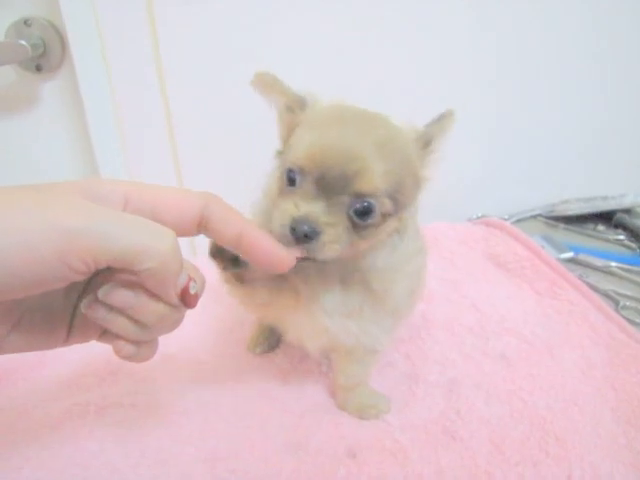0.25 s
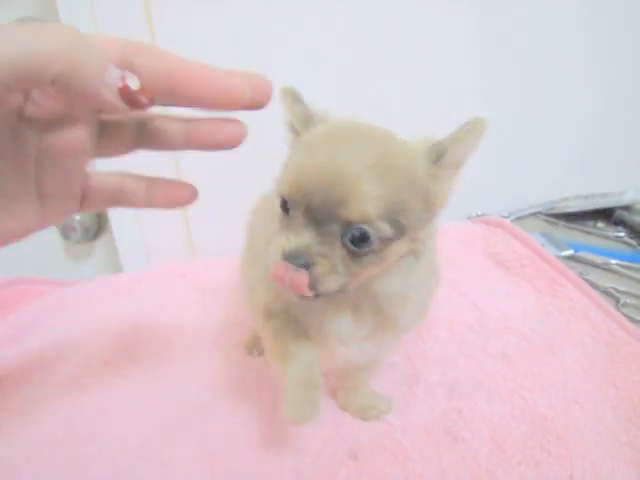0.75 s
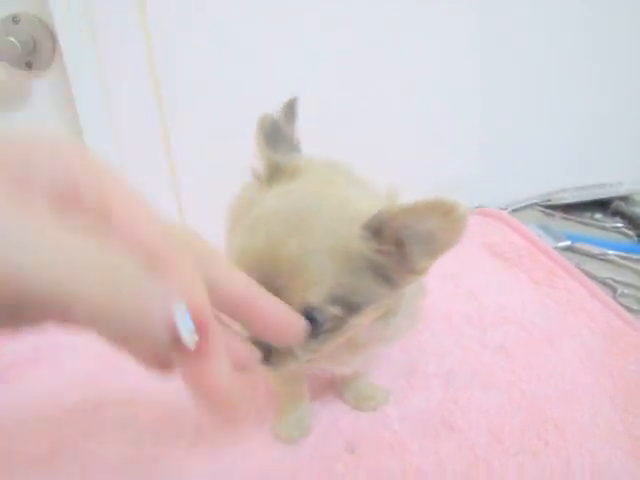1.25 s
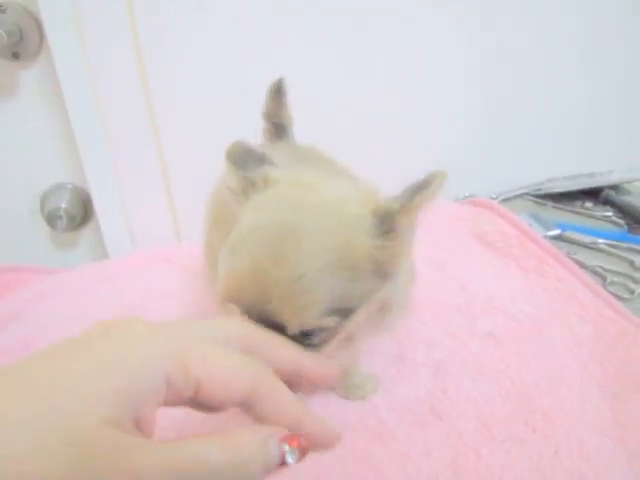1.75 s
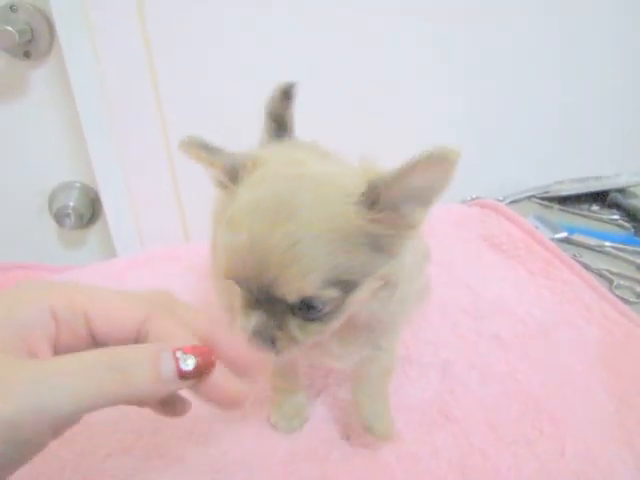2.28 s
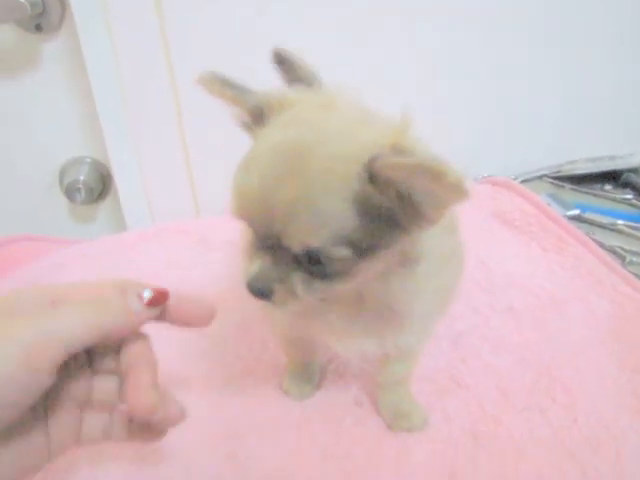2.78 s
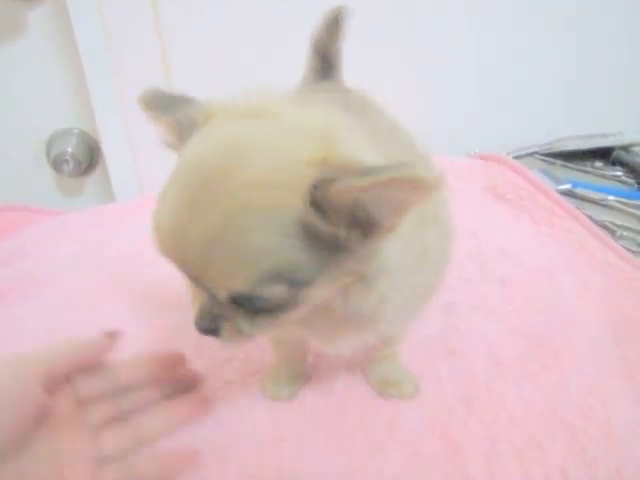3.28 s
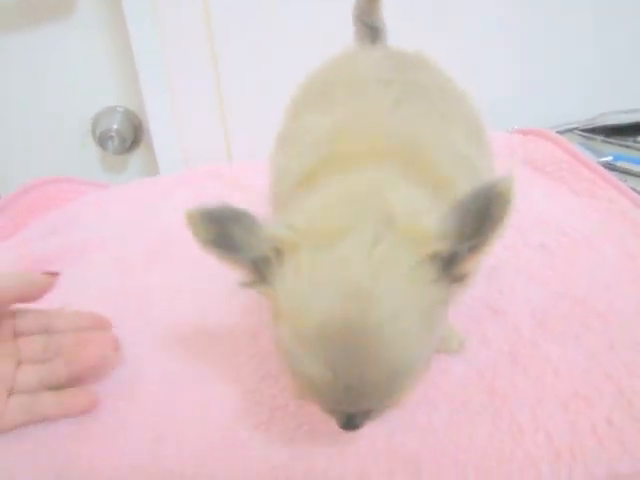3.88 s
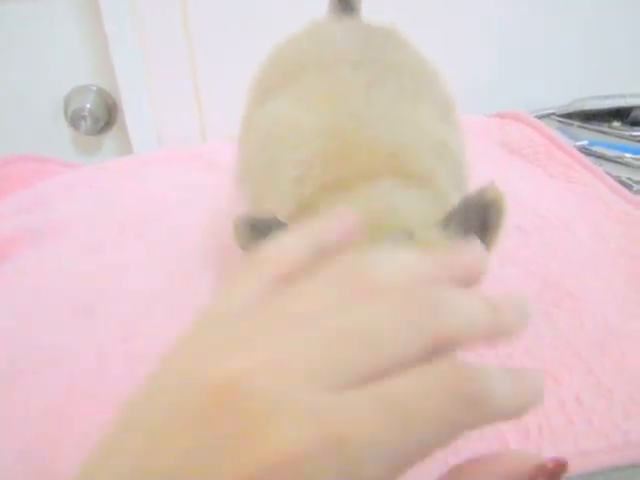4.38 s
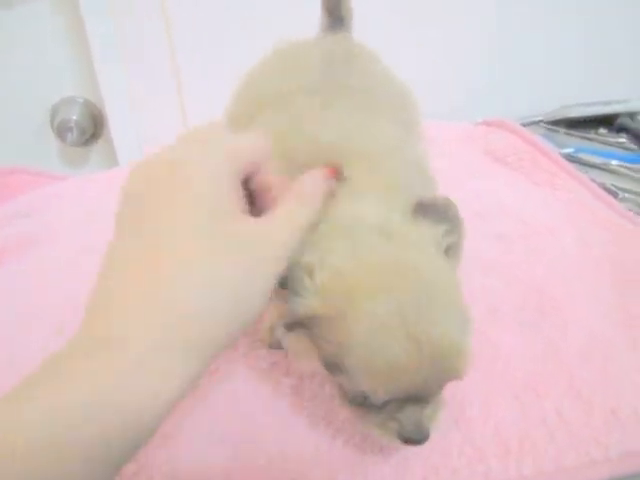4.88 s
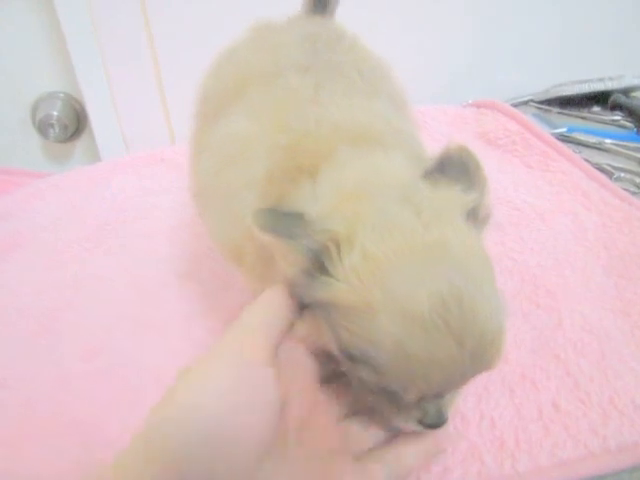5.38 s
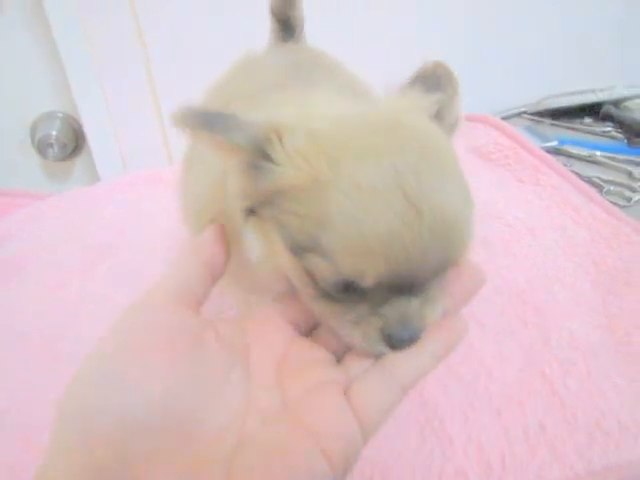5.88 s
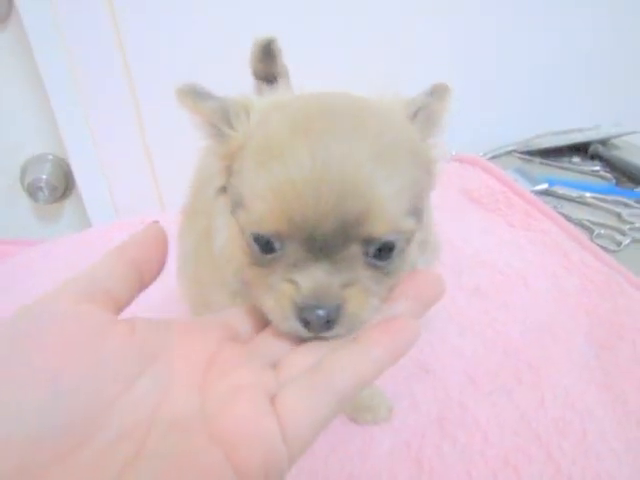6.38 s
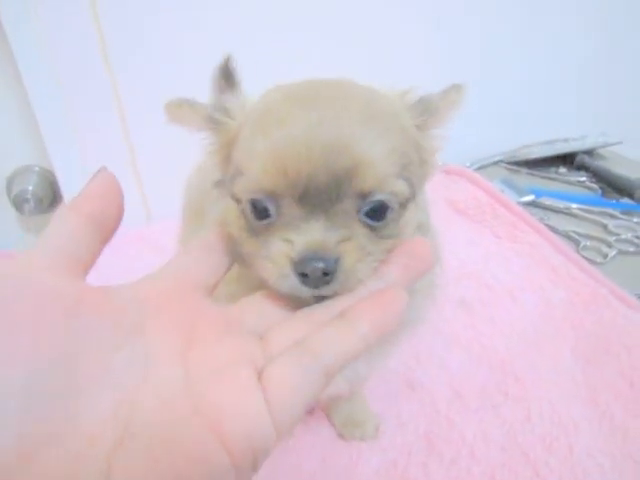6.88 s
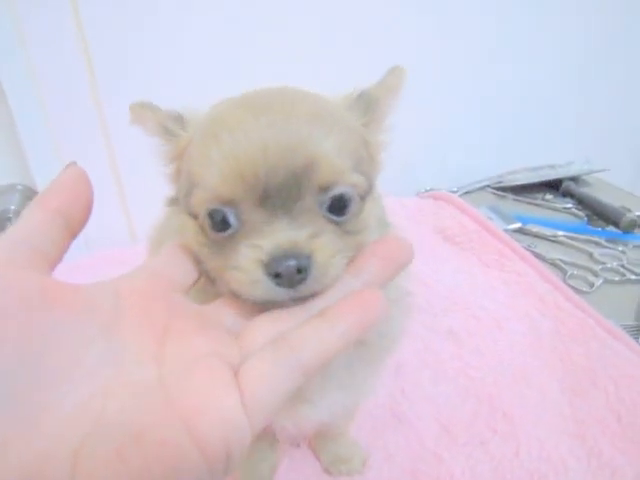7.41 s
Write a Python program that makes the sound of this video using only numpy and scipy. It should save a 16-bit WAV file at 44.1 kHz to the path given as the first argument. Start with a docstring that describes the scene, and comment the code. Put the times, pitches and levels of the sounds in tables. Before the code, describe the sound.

Quick, faint puppy sniffs and little nibbling clicks sound close and dry over a low hum and hiss. A dog gives a closed-mouth grumble, and later two sharp yaps ring off the walls of the room. A long, wavering howl follows, breaking harshly once and sinking in pitch. After a short pause comes one quiet nasal whimper, then a fast-swelling squeal that is cut off.

```python
"""A hard-walled room, where a dog grumbles, yaps twice, draws out a howl, whimpers and starts to squeal.
Each call is buzzing vocal folds and rasping breath, coloured by the throat and ringing off the walls.
Close up and dry, a tiny puppy sniffs in quick puffs of air and nibbles at a hand on a towel,
with small clicks of mouth, paws and fingernails. Rumble, machine hum and hiss lie underneath,
and a limiter ducks everything after the louder yap."""
import sys
import numpy as np
from scipy import signal
from scipy.fft import rfft, irfft, next_fast_len
from scipy.io import wavfile
from scipy.ndimage import uniform_filter1d

SR = 44100
rng = np.random.default_rng(int(sys.argv[2]) if len(sys.argv) > 2 else 0)


def output_pcm(signal):
    """Save a mono or channel-first signal as 16-bit PCM at the path in sys.argv[1].

    Samples are clipped to [-1, 1] before scaling.
    """
    pcm = np.clip(np.atleast_2d(signal).T, -1, 1) * 32767
    wavfile.write(sys.argv[1], SR, np.round(pcm).astype(np.int16))


N = 337365
TIME = np.arange(N) / SR
EDGE_HZ = 15900


def yaps():
    """Two sharp yaps, each through its own throat shape; the second is louder."""
    # start/s, first f/Hz, top f/Hz, swell/s, swell/dB, peak/dB, fade/(dB/s), top roughness/0-1,
    # first and top brightness/(dB/octave)
    first, second = [(3.585, 289.6, 814.5, .09, 13, -11.5, 170, .45, -13.5, 4.5),
                     (4.186, 487, 799.9, .078, 21, -2, 229, .29, -5.5, -0.5)]
    # throat resonances of each yap: f/Hz, gain/dB
    first_throat = [(150, -39), (350, -3), (620, -24.5), (860, 9.5), (1150, -3.5), (1600, 11), (1850, -4),
                    (2550, -17), (3200, 6), (3650, -47.5), (4900, -24), (5600, -41), (12000, -48),
                    (15000, -66)]
    second_throat = [(300, -37.5), (550, -33.5), (800, -15.5), (1100, -5.5), (1650, -2.5), (1820, -21),
                     (2600, -26), (3100, -15), (3600, -28), (4600, -14.5), (5400, -41), (6200, -34),
                     (7500, -65), (12000, -47), (15000, -61.5)]
    return (voice(yap_contour(*first), first_throat, opening=.13, jitter=.08, rasp=.75)
            + voice(yap_contour(*second), second_throat, opening=.06, jitter=.1, rasp=.65))


def yap_contour(start, first_hz, top_hz, swell_s, swell_db, peak_db, fade_db_per_s, top_rough,
                first_bright_db, top_bright_db):
    """The mouth snaps open and the pitch scoops up, clearing and swelling; then it sags and fades."""
    length_s, attack_s, release_s, mouth_opens_s = .185, .023, .052, .036
    sag_hz_per_s, first_rough = 108, .563
    t = np.arange(0, length_s, .001)
    scoop = np.sin(np.pi / 2 * np.minimum(t / swell_s, 1)) ** 2
    after = np.maximum(t - swell_s, 0)
    pitch = first_hz + (top_hz - first_hz) * scoop - sag_hz_per_s * after
    gate = np.clip(np.minimum(t / attack_s, (length_s - t) / release_s), .01, 1)
    level_db = peak_db - swell_db * np.maximum(1 - t / swell_s, 0) - fade_db_per_s * after
    rough = first_rough + (top_rough - first_rough) * scoop
    bright_db = np.interp(t, [0, mouth_opens_s], [first_bright_db, top_bright_db])
    return np.transpose([start + t, pitch, level_db + 20 * np.log10(gate), rough, bright_db])


def howl(quaver_hz=17, fry_hz=385.3, break_s=5.78, break_width_s=.074):
    """A clean, quavering note that rattles where it is low, breaks harshly once and stays hoarse."""
    # the sung line: t/s, f/Hz, level/dB
    melody = [(4.42, 294.5, -37), (4.53, 335, -34.5), (4.6, 422, -30), (4.78, 457, -30),
              (4.92, 458.8, -28.5), (5.18, 450, -26.5), (5.31, 437, -34.5), (5.42, 420.2, -28),
              (5.56, 364.5, -33.5), (5.66, 381.4, -31.5), (5.721, 475, -31), (5.77, 504.6, -28),
              (5.83, 475.2, -29.5), (5.89, 381.3, -32), (5.97, 366.2, -38.5), (6.05, 380.6, -27.5),
              (6.15, 352.4, -34), (6.2, 314.7, -30), (6.3, 214.8, -38), (6.35, 187.7, -46)]
    # rounded throat: f/Hz, gain/dB
    throat = [(150, 13), (400, 8.5), (620, -2.5), (920, 5), (1080, -13.5), (1300, -24.5), (1800, -24.5),
              (2150, -54.5), (4000, -85), (7000, -101.5)]
    # cracks into period doubling: t/s, length/s, depth/0-1
    cracks = [(5.01, .06, .25), (6.015, .06, .35)]
    at, hz, db = np.transpose(melody)
    t = np.arange(at[0], at[-1], 1 / SR)
    strain = np.exp(-((t - break_s) / break_width_s) ** 2)
    pitch = np.interp(t, at, hz) * (1 + .005 * waver(len(t), quaver_hz))
    fade = signal.windows.tukey(len(t) + 2, .04)[1:-1]
    quaver_db = 1.5 * waver(len(t), quaver_hz)
    level_db = np.interp(t, at, db) + 1.5 * strain + quaver_db + 20 * np.log10(fade)
    fry = np.maximum(1 - pitch / fry_hz, 0)
    rough = .021 + .85 * fry + .14 * strain + .1 * (t > break_s)
    bright_db = 1.8 + 16.5 * strain
    contour = np.transpose([t, pitch, level_db, rough, bright_db])
    return voice(contour, throat, opening=.04, jitter=.14, rasp=.45, cracks=cracks)


def nose_whistles():
    """Thin, fuzzy whistles of air in the nose ride on the howl, swelling and fading as they rise."""
    # start/s, end/s, first f/Hz, last f/Hz, peak/dB
    glides = [(5.42, 5.788, 4110, 4410, -62), (5.807, 6.194, 4265, 4957, -62.5)]
    out = np.zeros(N)
    for start, end, first_hz, last_hz, peak_db in glides:
        progress = np.clip((TIME - start) / (end - start), 0, 1)
        pitch = (first_hz + (last_hz - first_hz) * progress) * (1 + .04 * waver(N, 500))
        tone = np.sqrt(2) * np.sin(2 * np.pi * np.cumsum(pitch) / SR)
        out += amp(peak_db) * np.sin(np.pi * progress) * tone
    return out


def grumbles():
    """Low, raspy swells of voice behind a closed mouth."""
    # start/s, peak/s, end/s, top f/Hz, peak/dB, peak roughness/0-1, brightness/(dB/octave)
    swells = [(.3, .74, 1.3, 203.8, -34.5, 0.14, -2), (3.3, 3.61, 3.7, 235, -35, .55, -11)]
    # throat with the mouth shut: f/Hz, gain/dB
    throat = [(100, -3), (200, 3.5), (400, -6), (600, -23.5), (900, -23.5), (1500, -33), (3000, -70)]
    return sum(voice(soft_contour(*row, droop=.27, fade_db=-18.5), throat, jitter=.14, rasp=.97)
               for row in swells)


def whimper():
    """One small whimper through the nose."""
    # start/s, peak/s, end/s, top f/Hz, peak/dB, peak roughness/0-1, brightness/(dB/octave)
    swells = [(7.281, 7.386, 7.51, 389, -43, 0.23, 1.5)]
    # nasal resonances: f/Hz, gain/dB
    throat = [(380, -29), (780, 2), (1150, 3), (1550, -9.5), (2200, -14), (2500, -8), (2850, -3.5),
              (3700, -31), (5000, -22), (7000, -35)]
    return voice(soft_contour(*swells[0], droop=.08, fade_db=-16), throat, rasp=.56)


def soft_contour(start, peak, end, top_hz, peak_db, rough, bright_db, droop, fade_db):
    """One swell of effort: towards both ends the voice is lower, weaker and rougher."""
    t = np.arange(start, end, .002)
    slack = np.sin(np.pi / 2 * np.interp(t, [start, peak, end], [1, 0, 1])) ** 2
    pitch = top_hz * (1 - droop * slack)
    level_db = peak_db + fade_db * slack
    return np.transpose([t, pitch, level_db, rough + .23 * slack, np.full(len(t), bright_db)])


def squeal(rough=.11, bright_db=-16):
    """A nearly pure high note that swells fast at the very end."""
    # the rising note: t/s, f/Hz, level/dB
    melody = [(7.56, 1073, -56), (7.628, 1115, -35), (7.66, 1126, -7.5)]
    # pinched throat: f/Hz, gain/dB
    throat = [(500, -25), (1120, -7), (2200, -27), (2950, -8), (3600, -29), (7000, -50)]
    return voice([(*point, rough, bright_db) for point in melody], throat, rasp=.46)


def voice(contour, throat, opening=0, jitter=.086, shimmer=.8, rasp=.8, cracks=()):
    """Unsteady vocal folds and pulsing breath, through a throat that can open as the pitch rises."""
    # contour: t/s, f/Hz, level/dB, roughness/0-1, brightness/(dB/octave)
    at, *columns = np.transpose(contour)
    t = np.arange(at[0], at[-1], 1 / SR)
    pitch, level_db, rough, bright_db = (np.interp(t, at, c) for c in columns)
    rough = np.clip(rough, 0, 1)
    mouth = (pitch / pitch.max()) ** opening  # scales the throat's resonances
    tremor = .005 * waver(len(t), 22)
    turns = np.cumsum(pitch * (1 + tremor + jitter * rough * waver(len(t), 350))) / SR
    # in a crack strong and weak cycles alternate, which adds lines halfway between the harmonics
    order = np.arange(1, 33)[:, None] / 2
    split = sum(depth * np.exp(-(2 * (t - when) / length) ** 2) for when, length, depth in cracks)
    partials = amp(read(throat, order * pitch / mouth) + bright_db * np.log2(order))
    partials *= np.where(order % 1, split * (order > 1), 1)
    partials *= (order * pitch < EDGE_HZ) / np.sqrt((partials ** 2).sum(0) / 2)
    folds = (partials * np.cos(2 * np.pi * order * turns)).sum(0)
    folds *= 1 + shimmer * rough * waver(len(t), 250)
    # turbulence takes the same colour, moment by moment
    hz, frames, turbulence = signal.stft(rng.standard_normal(len(t)), SR, nperseg=512)
    f0, opened, tilt_db = (np.interp(frames, t - at[0], c) for c in (pitch, mouth, bright_db))
    octaves = np.log2(np.maximum(hz[:, None] / f0, 1))
    colour = amp(read(throat, hz[:, None] / opened) + tilt_db * octaves)
    colour /= np.sqrt((colour ** 2).mean(0))
    air = signal.istft(turbulence * colour, SR, nperseg=512)[1][:len(t)]
    air *= 1 + .31 * np.cos(2 * np.pi * turns)  # one puff a cycle
    blend = ((1 - rough) * folds + rasp * rough * air) / np.hypot(1 - rough, rasp * rough)
    flutter_db = 1.5 * waver(len(t), 28)
    out = np.zeros(N)
    add(out, at[0], amp(level_db + flutter_db) * blend)
    return out


def sniffs(gap_s=.093, accent_db=2):
    """The puppy sniffs in bouts, weak and strong in turn and often quickening."""
    # first/s, last/s, hurry/0-1, first level/dB, last level/dB, sniff length/s, brightness/(dB/octave)
    bouts = [(.43, 0.482, 0, -59, -60, 0.057, 5), (.626, 1.068, .17, -51, -50.5, 0.035, 5),
             (1.186, 1.248, 0, -52.5, -54, 0.055, 1), (1.916, 2.471, 0.1, -59, -64, 0.044, -1),
             (2.781, 3.55, .23, -54.5, -49, 0.078, -2), (3.695, 4.07, 0, -50, -54, 0.11, -1)]
    # single puffs, plus one stronger, longer sniff in the middle of a bout:
    # centre/s, length/s, level/dB, brightness/(dB/octave)
    puffs = [(0.27, 0.067, -43, -17.5), (3.305, 0.14, -47, -3), (4.982, 0.11, -55, 1.5),
             (5.345, 0.16, -47, -8), (6.52, .08, -44.5, -14)]
    out = np.zeros((2, N))
    for first, last, hurry, first_db, last_db, length, bright_db in bouts:
        count = round((last - first) / gap_s) + 1
        for k, progress in enumerate(np.linspace(0, 1, count)):
            centre = first + (last - first) * (progress + hurry * progress * (1 - progress))
            db = first_db + (last_db - first_db) * progress - accent_db * (-1) ** k
            add(out, *puff(centre, length, db, bright_db))
    for row in puffs:
        add(out, *puff(*row))
    return out


def puff(centre, length, db, bright_db):
    """One smooth draw of air through a tiny nose; gives its start time and its sound."""
    # air in the nostrils: f/Hz, gain/dB
    colour = [(400, -28.5), (1200, -6.5), (2800, 5.5), (5000, 3.5), (7500, 1.5), (12000, -3), (16000, -14)]
    t = (np.arange(8192) - 4096) / SR
    swell = np.exp(-(3.06 * t / length) ** 2)
    return centre + t[0], amp(db) * swell * noise(colour, len(t), bright_db)


def clicks(trim_db=-3, skirt_db=-13, rise_s=.0004):
    """Mouth, paws and fingernails: each contact is a brief burst around one resonance."""
    # the clearest contacts: t/s, level before trim/dB, ring f/Hz, T60/s
    contacts = [(0.431, -36, 2700, .027), (.501, -40.5, 2780, .03), (1.093, -34.5, 2860, 0.016),
                (1.2, -29.5, 3750, 0.01), (1.211, -32, 3950, 0.012), (1.591, -37, 1980, 0.02),
                (1.797, -33, 2390, 0.012), (1.854, -44, 4300, 0.074), (2.127, -38, 1900, .025),
                (2.171, -35.5, 7650, 0.011), (2.659, -41, 620, 0.043), (3.112, -32, 4800, 0.0079),
                (6.1, -17, 5350, 0.0028), (6.94, -30, 10500, .016), (7.059, -33, 4480, .009),
                (7.084, -33.5, 4950, .011)]
    out, t = np.zeros((2, N)), TIME[:8192]
    for start, db, hz, t60 in contacts + nibbles():
        colour = [(hz / 6, 2 * skirt_db), (hz / 1.35, skirt_db), (hz, 0),
                  (hz * 1.35, skirt_db), (hz * 4, 2 * skirt_db), (hz * 20, 4 * skirt_db)]
        envelope = (1 - np.exp(-t / rise_s)) * np.exp(-np.log(1000) * t / t60)
        add(out, start, amp(db + trim_db) * envelope * noise(colour, len(t)))
    return out


def nibbles(count=10, span_s=(.4, 3.2), db=-42, spread_db=3, centre_hz=4600, t60=.017):
    """Fainter contacts at random moments while the puppy nibbles, each with its own force and ring."""
    return [(np.interp(when, [-1, 1], span_s), db + spread_db * force, centre_hz * 2 ** octaves, t60)
            for when, force, octaves in rng.uniform(-.9, 1, (count, 3))]


def room(x, wet_db):
    """Direct sound plus dense reflections off hard walls, dying away band by band."""
    # reverb time: f/Hz, T60/s
    decay = [(150, 0.36), (500, 0.71), (1600, 0.75), (3200, 0.62), (5000, 0.55), (12000, .35)]
    # the side that the reflections favour: f/Hz, left minus right/dB
    lean = [(300, -2.5), (700, -0.5), (1600, 0), (3000, -5), (4400, 7.5), (7000, -4.5)]
    taps = pair(rng.standard_normal((2, SR)) * (rng.random((2, SR)) < .12))
    taps *= TIME[:SR] > .004  # pre-delay
    hz, t, bands = signal.stft(taps, SR, nperseg=256)
    lean_db = np.multiply.outer([.5, -.5], read(lean, hz))[..., None]
    decay_db = 60 * t / read(decay, hz)[:, None]
    tail = signal.istft(bands * amp(lean_db - decay_db), SR, nperseg=256)[1]
    mids = abs(rfft(tail[:, :SR]))[:, 300:3000]
    tail /= np.sqrt(np.mean(mids ** 2))  # unity gain in the mids
    wet = signal.fftconvolve(x[None], tail, axes=1)[:, :N]
    return (x + amp(wet_db) * wet) / np.sqrt(1 + amp(wet_db) ** 2)


def room_tone(rumble_db=-50, hiss_db=-58):
    """A bed of wavering machine hum, room rumble and microphone hiss."""
    # hum lines: f/Hz, level/dB
    lines = [(26.9, -51.5), (58.5, -56), (91, -54.5), (119, -63), (393, -65.5), (1571, -77.5), (10654, -87)]
    # noise colours: f/Hz, relative level/dB
    rumble = [(20, -7), (45, -6), (95, -5.5), (145, -13.5), (215, -12), (290, -14.5), (400, -16),
              (450, -24), (620, -20.5), (900, -23), (1100, -23), (1300, -20), (1550, -38.5), (2100, -55),
              (3500, -100)]
    hiss = [(820, -25), (1400, -6), (1920, -6), (2330, -7.5), (3610, -10.5), (4380, -11), (9320, -16.5),
            (16000, -24.5)]
    hum = np.zeros(N)
    for hz, db in lines:
        level = amp(db) * np.sqrt(2) * (1 + .35 * waver(N, 5))
        hum += level * np.sin(2 * np.pi * hz * TIME + .9 * waver(N, 4))
    return hum + amp(rumble_db) * noise(rumble, N) + amp(hiss_db) * noise(hiss, N)


def noise(colour, size, tilt_db=0):
    """Stereo noise of unit level with a given spectrum, tilted per octave above the bass."""
    padded = next_fast_len(size, True)
    hz = np.fft.rfftfreq(padded, 1 / SR)
    gain = amp(read(colour, hz) + tilt_db * np.log2(1 + hz / 170))
    white = rfft(pair(rng.standard_normal((2, padded))))
    return unit(irfft(white * gain, padded)[:, :size])


def pair(x):
    """Two unrelated signals become what two close microphones hear: alike in the bass."""
    # what both sides share: f/Hz, left-right correlation/0-1
    alike = [(30, 0.54), (85, 0.64), (180, 0.79), (400, 0.87), (800, 0.8), (1600, 0.52), (2800, 0.19),
             (5000, 0.048), (12000, .05)]
    spectra = rfft(x)
    shared = read(alike, np.fft.rfftfreq(x.shape[1], 1 / SR))
    mid = spectra[0] * np.sqrt((1 + shared) / 2)
    side = spectra[1] * np.sqrt((1 - shared) / 2)
    return irfft([mid + side, mid - side], x.shape[1])


def waver(size, hz):
    """A random drift of unit level that changes course hz times a second."""
    at = np.arange(size) * hz / SR
    return unit(np.interp(at, np.arange(8192), rng.standard_normal(8192)))


def read(points, hz):
    """A curve of (f/Hz, value) points, joined on a log-frequency axis."""
    f, value = np.transpose(points)
    return np.interp(np.log(hz + 1), np.log(f + 1), value)


def add(mix, start_s, sound):
    """Mixes a sound in at its start time."""
    part = mix[..., max(round(start_s * SR), 0):][..., :sound.shape[-1]]
    part += sound[..., :part.shape[-1]]


def amp(db):
    """Decibels as a gain."""
    return 10 ** (np.asarray(db) / 20)


def unit(x):
    """Scales to an RMS of one."""
    return x / np.sqrt(np.mean(x ** 2) + 1e-20)


def scene():
    """The yaps fill the room, the softer calls come through more directly, and the puppy stays dry."""
    yapping, howling = yaps(), howl()
    small_calls = grumbles() + whimper() + squeal()
    dog = room(yapping, wet_db=6)
    dog += room(howling + nose_whistles(), wet_db=0)
    dog += room(small_calls, wet_db=-1)
    return dog + sniffs() + clicks() + room_tone()


def record(dry, limit_db=-13, recovery_db_per_s=22, attack_s=.0034):
    """A limiter ducks quickly and recovers slowly; then soft ends and the band limit."""
    power = abs(uniform_filter1d((dry ** 2).mean(0), size=300))
    power_db = 10 * np.log10(power + 1e-12)
    recovery_db = TIME * recovery_db_per_s
    held_db = np.maximum.accumulate(power_db + recovery_db) - recovery_db
    over_db = np.maximum(held_db - limit_db, 0)
    pole = np.exp(-1 / (attack_s * SR))
    ducked = dry / amp(signal.lfilter([1 - pole], [1, -pole], over_db))
    ducked *= signal.windows.tukey(N, .0006)
    lowpass = signal.firwin(511, EDGE_HZ, window=("kaiser", 9), fs=SR)
    return signal.oaconvolve(ducked, lowpass[None], "same")


dry = scene()
out = record(dry)
output_pcm(out)
```